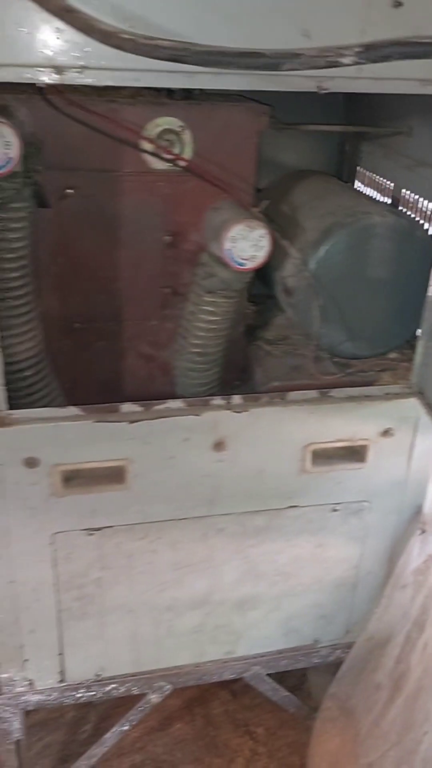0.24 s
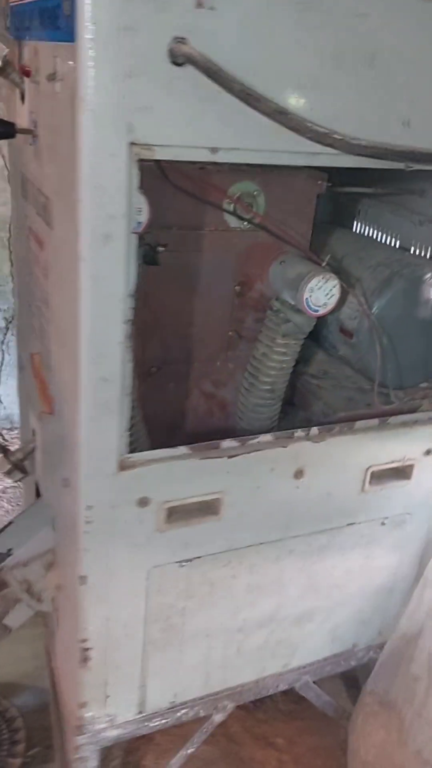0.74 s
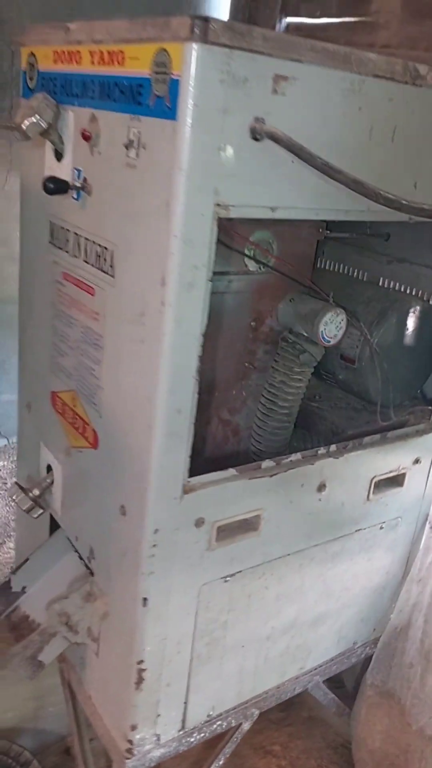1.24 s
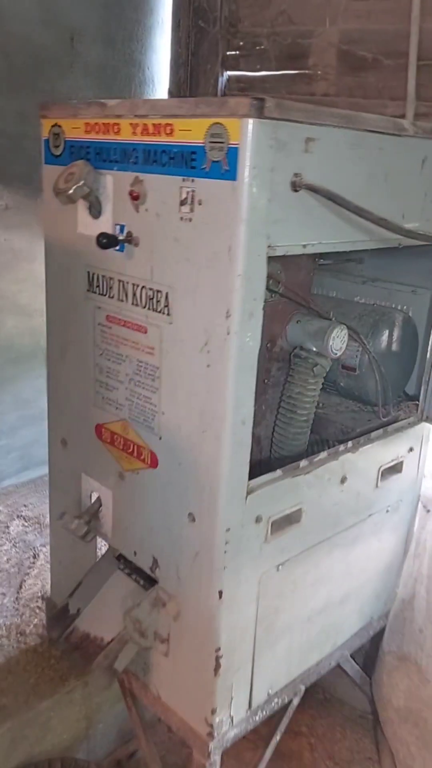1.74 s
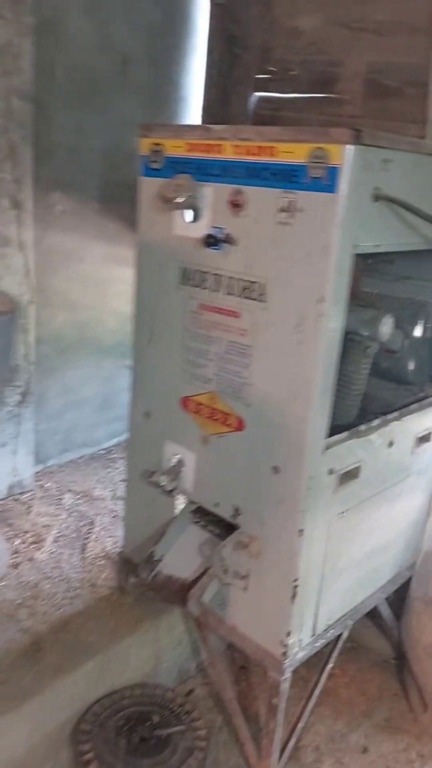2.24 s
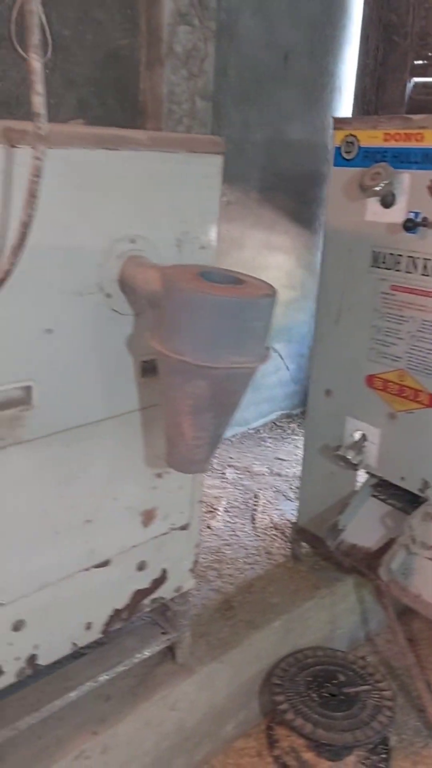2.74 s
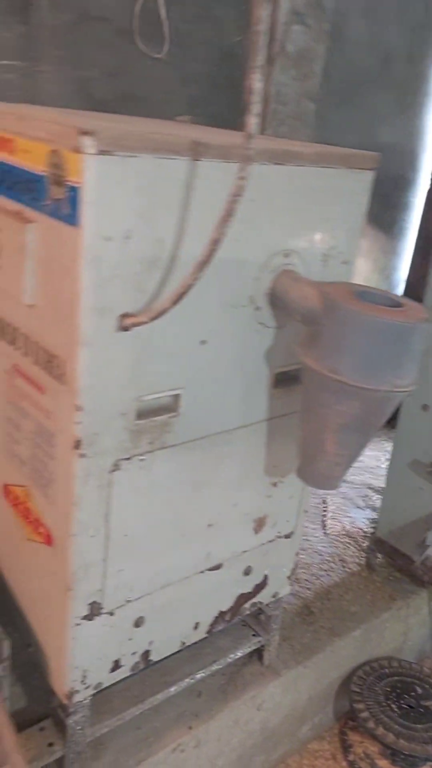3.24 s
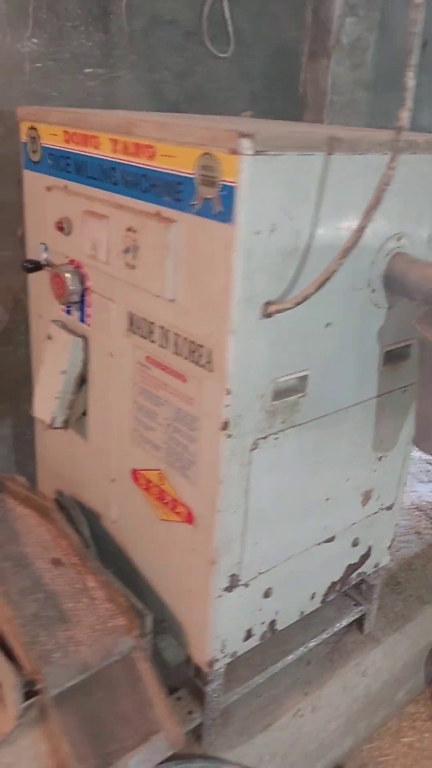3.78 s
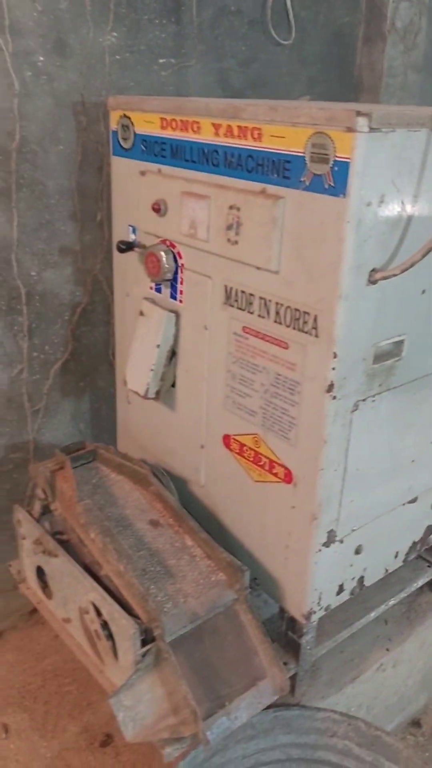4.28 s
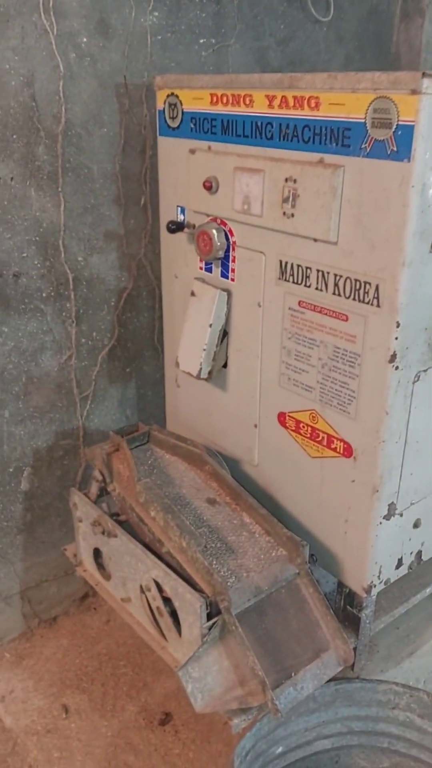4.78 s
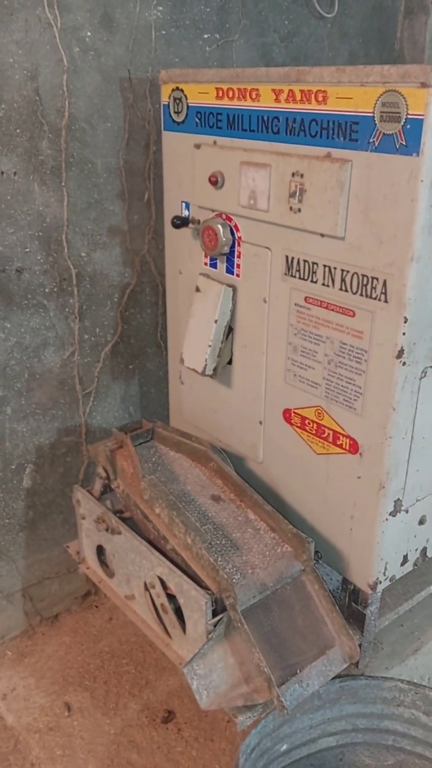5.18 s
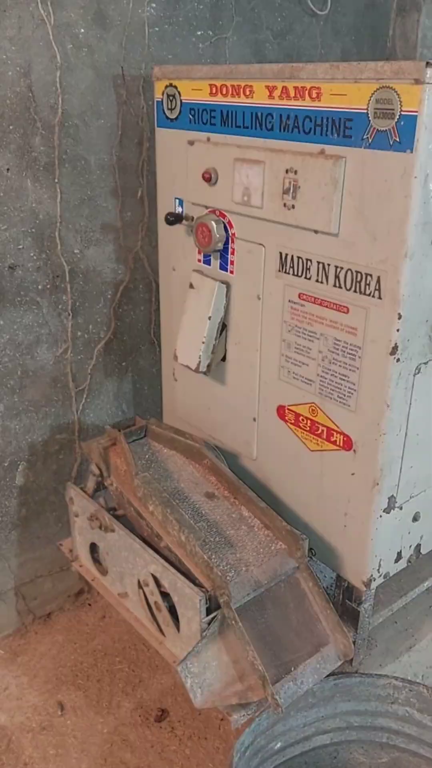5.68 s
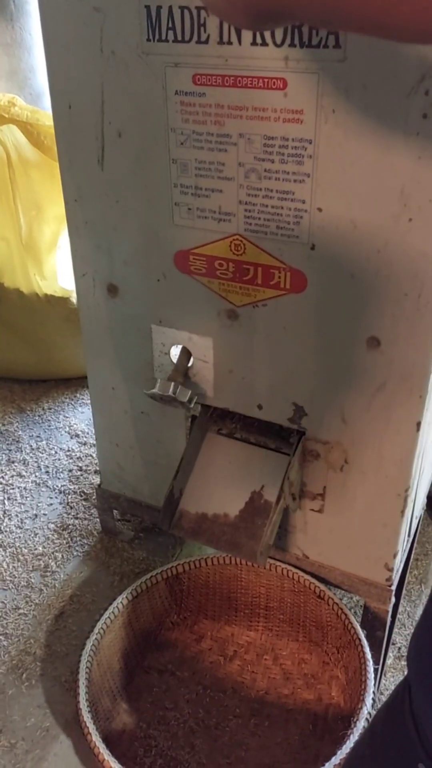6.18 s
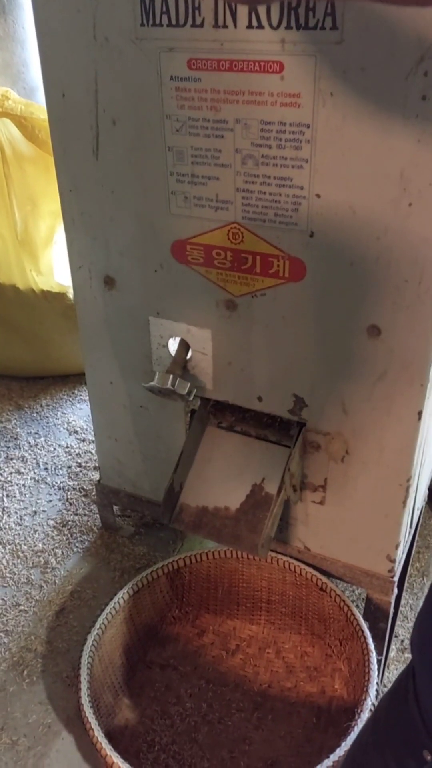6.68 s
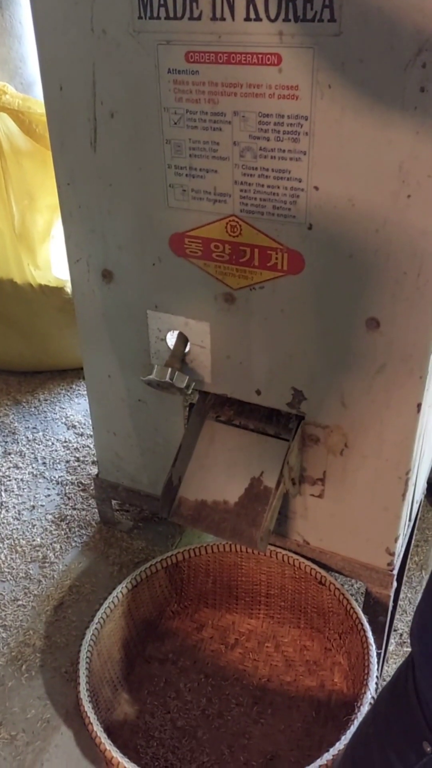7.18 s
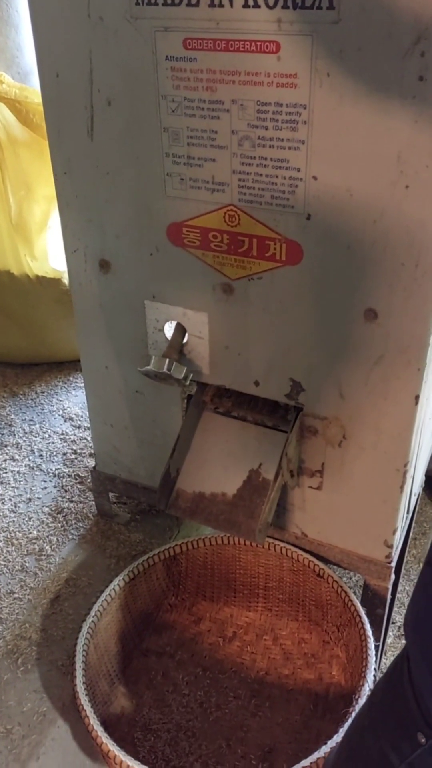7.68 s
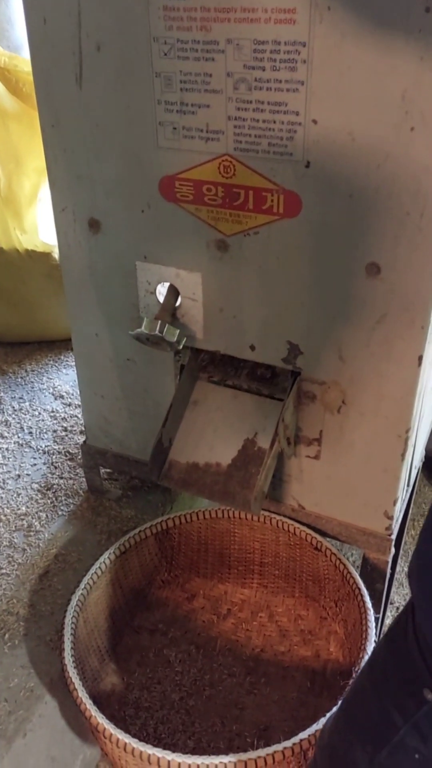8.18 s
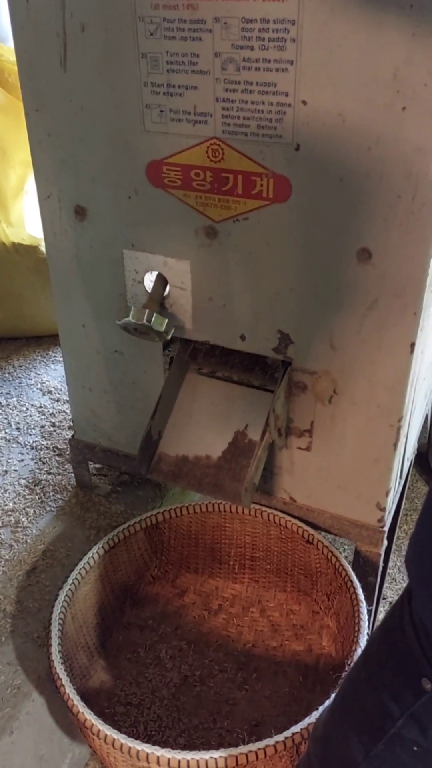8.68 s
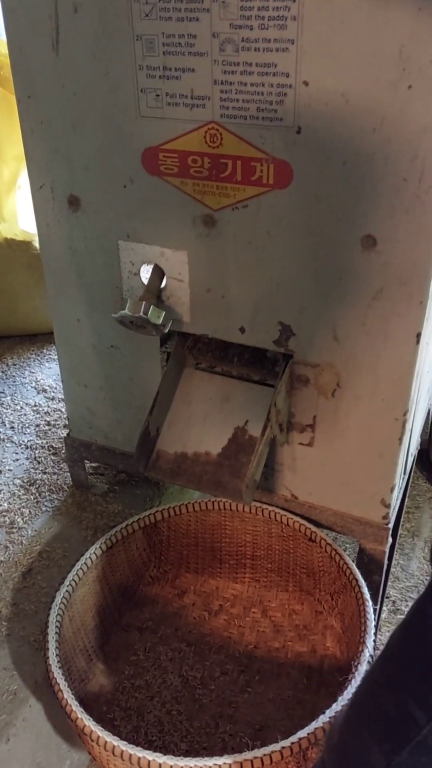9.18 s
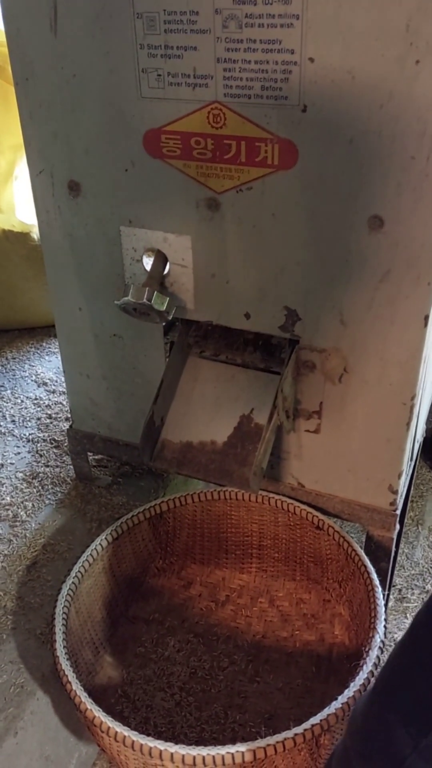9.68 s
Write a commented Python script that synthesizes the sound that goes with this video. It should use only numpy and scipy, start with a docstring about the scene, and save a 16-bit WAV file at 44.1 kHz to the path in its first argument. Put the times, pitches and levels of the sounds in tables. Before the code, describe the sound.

In a quiet farm shed with a slight echo, chicks chirp and a hen clucks softly, with fingers rubbing and once sharply tapping the right side of the microphone. The sound then switches abruptly to a nearby rice milling machine already at full speed. Its motor and rotor drone loudly and steadily, with ringing metal panels, a low roar of air and a hiss of grain.

```python
"""Chicks peep and a hen clucks in a hard-walled farm shed, while a hand rustles and taps on the camera,
close to the right microphone. The chicks whistle in falling and rising glides; the hen pushes rough
pulses through her throat. After an instant of silence we stand by a belt-driven rice mill at full
speed: its rotor sings a stack of orders, motor and shafts hum, sheet panels ring, and air and grain
rush through the housing."""
import sys
import numpy as np
from scipy import signal
from scipy.fft import rfft, irfft, next_fast_len
from scipy.io import wavfile
from scipy.ndimage import map_coordinates

SR = 44100
rng = np.random.default_rng(int(sys.argv[2]) if len(sys.argv) > 2 else 0)


def int16_out(signal):
    """Quantize to a 16-bit WAV file."""
    q = np.round(np.clip(np.atleast_2d(signal).T, -1, 1) * 32767)
    wavfile.write(sys.argv[1], SR, q.astype(np.int16))


N = 437913

SHED_END_S, MILL_START_S = 5.771, 5.802
BLADE_PASS_HZ = 220.15
# how alike the mill's rush arrives at the two microphones: f/Hz, likeness/1
MILL_LIKENESS = [(100, 0.88), (200, 1), (350, 0.59), (700, 0.4), (1300, 0), (3000, 0), (12000, 0.032)]


def chicks(far_db=-58, far_calls=34, sag_octaves_per_s=1.1, query_start_hz=2100, beak_hz=1880):
    """Near chicks cry, chirp and peep; the rest of the brood chatters farther off, with more room sound."""
    # the nearest chick holds a note, then breaks downward: t/s, length/s, level/dB, pan/dB
    cries = [(0.073, .26, -44.5, -3), (0.766, 0.19, -43.5, -4), (1.565, 0.096, -51.5, -5),
             (2.038, 0.23, -44, -3), (2.657, .24, -43.5, -2), (3.419, 0.23, -41.5, -2),
             (4.487, .28, -44, 2.5), (5.04, .27, -44.5, -1), (5.68, 0.099, -51.5, 1)]
    # pitch of every cry at start, knee and end: f/Hz
    cry_hz = [3356, 3056, 2140]
    # quick diving chirps: t/s, length/s, level/dB
    chirps = [(0.463, .09, -56), (1.72, .09, -66), (2.371, 0.096, -54.5), (2.833, 0.074, -50.5),
              (2.986, 0.085, -62), (3.584, 0.091, -49), (4.618, 0.12, -50), (4.859, 0.1, -50.5),
              (5.318, 0.11, -52), (5.607, 0.089, -62)]
    # pitch of every chirp at start, knee and end: f/Hz
    chirp_hz = [5240, 4000, 3170]
    # plain peeps that sag evenly: t/s, length/s, first f/Hz, level/dB
    peeps = [(0.125, 0.24, 3970, -54.5), (.93, 0.14, 4520, -63), (1.25, 0.13, 3640, -56),
             (1.755, 0.22, 4870, -57), (1.97, 0.094, 3940, -51.5), (2.509, 0.15, 4750, -54.5),
             (3.229, 0.27, 2914, -42), (3.251, 0.26, 4750, -52.5), (3.763, 0.14, 4140, -57.5),
             (3.979, .22, 2856, -45.5), (4.035, 0.085, 4840, -47), (4.09, 0.1, 4480, -52),
             (4.676, 0.077, 2600, -48), (4.985, .12, 4650, -61), (5.257, .08, 5260, -56),
             (5.655, 0.085, 3990, -52)]
    # rising, questioning peeps: t/s, length/s, last f/Hz, level/dB
    queries = [(1.125, .09, 3630, -58.5), (3.16, .08, 2850, -61), (3.874, 0.11, 2690, -50.5)]
    out = np.zeros((2, N))
    for s, length, db, pan_db in cries:
        call = peep(length, cry_hz, knee=.64, loudest=0.48, break_curve=.8, waver=.007,
                    overtone_db=-22.5, rasp_db=-19, break_db=22, rasp_hz=1295, swell_db=6.5)
        add(out, s, amp(db) * sides(pan_db) * in_shed(call, wet_db=3))
    for s, length, db in chirps:
        call = peep(length, chirp_hz, knee=.5, overtone_db=-23, rasp_db=-13.5, swell_db=5)
        add(out, s, amp(db) * sides(-5) * in_shed(call, wet_db=3))
    for s, length, first_hz, db in peeps:
        pitches = first_hz * 2 ** (-sag_octaves_per_s * length * np.array([0, .5, 1]))
        call = peep(length, pitches, overtone_db=-27, rasp_db=-12.5, break_db=12, swell_db=9.5)
        add(out, s, amp(db) * sides(-3.5) * in_shed(call, wet_db=0))
    for s, length, last_hz, db in queries:
        call = peep(length, np.geomspace(query_start_hz, last_hz, 3), swell_db=2)
        add(out, s, amp(db) * sides(-7) * in_shed(call, wet_db=0))
    for k, (when, high, faint) in enumerate(rng.random((far_calls, 3))):
        s = (k + when) * SHED_END_S / far_calls
        pitches = (2700 + 1700 * high) * np.array([1.1, .95, .75])
        call = peep(.11, pitches, overtone_db=-21, rasp_db=-14, swell_db=2)
        add(out, s, amp(far_db - 4.7 * faint) * sides(-1.4) * in_shed(call, wet_db=11))
    # a chick is too small to radiate much below beak_hz
    return filtered(out, lambda hz: 1 / np.sqrt(1 + (beak_hz / (hz + 1)) ** 10))


def peep(length, pitches, knee=0.52, loudest=0.49, break_curve=1.097, waver=0.0111, overtone_db=-21,
         rasp_db=-16, break_db=10, rasp_hz=1000, swell_db=8, swell_width=0.24, edge_s=0.0097):
    """A chick's whistle swells, glides to its knee, then breaks hoarsely away to its last pitch."""
    t = np.arange(int(length * SR)) / SR
    u, size = t / length, len(t)
    first_hz, knee_hz, last_hz = pitches
    to_knee = np.minimum(u / knee, 1)
    past_knee = np.maximum(u - knee, 0) / (1 - knee)
    pitch = first_hz + (knee_hz - first_hz) * to_knee + (last_hz - knee_hz) * past_knee ** break_curve
    phase = 2 * np.pi * np.cumsum(pitch * (1 + waver * wobble(108.4, size))) / SR
    gate = np.minimum(np.minimum(t, length - t) / edge_s, 1)
    arch_db = swell_db * np.exp(-((u - loudest) / swell_width) ** 2)
    swell = unit(gate * amp(arch_db + 4.5 * wobble(70.5, size)))
    fringe = wobble(rasp_hz, size) * np.sin(phase) + wobble(rasp_hz, size) * np.cos(phase)
    rasp = amp(rasp_db + break_db * np.abs(2 * u - 1)) * fringe  # cleanest in mid-call
    overtone = amp(overtone_db + 3 * wobble(300, size)) * np.sin(2 * phase)
    return unit(np.sin(phase) + overtone + rasp) * swell


def hen(typical_hz=237.2, typical_s=0.0638, fall=0.259, jitter=0.054, lead_s=0.00027):
    """Clucks are short falling runs of rough pulses through the throat; whines are hoarse single notes."""
    # clucks, a little to the right: t/s, length/s, level/dB
    clucks = [(0.234, 0.061, -41), (0.643, 0.08, -42), (1.004, 0.058, -46), (1.055, 0.029, -42),
              (1.123, 0.03, -44), (1.395, 0.069, -42.5), (1.753, 0.072, -42.5), (2.04, 0.086, -38.5),
              (2.354, 0.073, -42.5), (2.69, .065, -37), (3.025, 0.064, -39.5), (3.408, 0.061, -37.5),
              (3.908, 0.056, -38), (4.421, 0.067, -44.5)]
    # resonances of her throat: f/Hz, gain/dB
    throat = [(120, -22), (220, -12), (330, -12), (480, -9), (680, -4), (950, -7.5), (1130, -12.5),
              (1350, -27), (2500, -25.5), (5000, -93)]
    # whining notes: t/s, length/s, f/Hz, level/dB
    whines = [(1.037, 0.05, 1216, -51), (3.803, 0.12, 948, -54), (5.649, 0.068, 1010, -53.5)]
    out = np.zeros((2, N))
    for s, length, db in clucks:
        pitch_hz = typical_hz * (typical_s / length) ** .13  # shorter clucks are higher
        u = np.linspace(0, 1, int(length * SR))
        cycles = np.cumsum(pitch_hz * (1 + fall * (.5 - u) + jitter * wobble(206, len(u)))) / SR
        pulses = unit(np.diff(np.floor(cycles), prepend=0))
        voice = unit(filtered(pulses + rng.standard_normal(len(u)), colour(throat)))
        chest = 0.3 * u * np.cos(2 * np.pi * cycles)  # the fundamental grows as the note falls
        cluck = (voice + chest) * np.interp(u, [0, .35, .75, 1], [0, 1, 1, 0])
        add(out, s, amp(db) * sides(-4.5) * in_shed(cluck, wet_db=-1.5))
    for s, length, pitch_hz, db in whines:
        size = int(length * SR)
        cycles = np.cumsum(pitch_hz * (1 + 0.23 * wobble(700, size))) / SR
        whine = unit(np.sin(2 * np.pi * cycles) * np.hanning(size))
        add(out, s, amp(db) * in_shed(whine, wet_db=4))
    # the right microphone is nearer and hears her first
    return filtered(out, lambda hz: np.exp(1j * np.pi * hz * lead_s * np.array([[-1], [1]])))


def mill(move_s=(7.7, 8.6), slip=0.000696):
    """The running mill, as the camera shifts from spot A to spot B in its standing waves."""
    start = round(MILL_START_S * SR)
    t = np.arange(start, N) / SR
    spot = np.interp(t, move_s, [0, 1])
    clock = np.cumsum(1 + slip * wobble(3.03, len(t))) / SR  # belt slip sways all speeds together
    out = air_and_grain(clock) + rotor(clock, spot) + drive_hum(clock, spot) + panels(spot)
    return np.pad(out, ((0, 0), (start, 0)))


def air_and_grain(clock, roar_db=-19.5, hiss_db=-28.5, belt_lap_hz=9.87, blades=5, chop=0.055):
    """Air and grain rush through the mill; part repeats with each belt lap and each turn of the rotor."""
    # low roar of air and grain: f/Hz, density/dB
    roar_colour = [(25, -33), (50, -24.5), (90, -6), (170, -7.5), (250, 1), (400, -3), (530, -4.5),
                   (740, -2.5), (950, -10), (1350, -9.5), (1480, -13.5), (2100, -15), (2500, -18),
                   (5000, -52)]
    # hiss of the husks: f/Hz, density/dB
    husk_colour = [(900, -39), (1800, -32), (2500, -8), (3300, -2.5), (4450, -2.5), (4850, -4.5),
                   (5200, -2), (5800, -5), (6400, -6.5), (7400, -6), (8300, -11), (10300, -11),
                   (12000, -6.5), (14000, -13), (16000, -12)]
    size = len(clock)
    belt = amp(-6) * rattle(colour(roar_colour), belt_lap_hz, clock)
    dull_husks = lambda hz: colour(husk_colour)(hz) / (1 + (hz / 7500) ** 4)
    shaft = amp(-8) * rattle(dull_husks, BLADE_PASS_HZ / blades, clock)
    roar_gain = amp(roar_db + 0.45 * wobble(21.99, size)) * sides(-2.5)
    roar = roar_gain * unit(rush(colour(roar_colour), MILL_LIKENESS)[:, -size:] + belt)
    hiss_gain = amp(hiss_db + 0.54 * wobble(150, size)) * sides(-4.5)
    hiss = hiss_gain * unit(rush(housing(husk_colour), MILL_LIKENESS)[:, -size:] + shaft)
    # every pass of a blade chops the hiss a little
    return roar + hiss * (1 + chop * np.sin(2 * np.pi * BLADE_PASS_HZ * clock))


def rattle(gain, turn_hz, clock):
    """Noise that repeats with every turn of a shaft or belt; its bass is alike at both microphones."""
    pattern = rng.standard_normal((2, round(SR / turn_hz)))
    laps = pattern[:, np.round(clock * SR).astype(int) % pattern.shape[1]]
    share = lambda hz: np.sqrt(np.abs(1 + np.array([[1], [-1]]) * along(MILL_LIKENESS, hz)))
    mid, side = filtered(laps, lambda hz: gain(hz) * share(hz))
    return unit(np.array([mid + side, mid - side]))


def housing(points, ripple_db=2.0, spacing_hz=55):
    """A colour rippled by the many small modes of the sheet-metal housing."""
    knots = rng.standard_normal(1024)
    ripple = lambda hz: map_coordinates(knots, [hz / spacing_hz], mode="mirror")
    return lambda hz: colour(points)(hz) * amp(ripple_db * ripple(hz))


def rotor(clock, spot, trim_db=-1):
    """The rotor sings at whole multiples of the rate at which its blades pass."""
    # rotor orders: multiple, relative level at A/dB, at B/dB, pan/dB
    orders = [(2, -41, -59, -19), (3, -31.5, -27, 2), (4, -30.5, -33.5, -31), (5, -42.5, -47, -15),
              (6, -35.5, -31, 2.5), (7, -39, -40, -1), (8, -43.5, -42, -14), (9, -42, -72, -2),
              (10, -43, -42, -2), (11, -62, -49, 3), (13, -48, -48, 28), (15, -52.5, -50, 45)]
    return sum(tone(order * BLADE_PASS_HZ * clock, trim_db + a_db + spot * (b_db - a_db), pan_db)
               for order, a_db, b_db, pan_db in orders)


def drive_hum(clock, spot, trim_db=-1.5):
    """Motor, belts and shafts hum, each at its own pitches."""
    # tones of the drive: f/Hz, relative level at A/dB, at B/dB, pan/dB
    lines = [(67.3, -58, -52, -3), (87.5, -41, -39, -3), (100.9, -40, -38, -4), (173.6, -46, -44, -10),
             (261.1, -41, -35, -12), (388.9, -37, -42, 0), (476.4, -35, -34, 12), (562.6, -40, -34, -7),
             (576, -36, -35, 1), (635.2, -38, -39, -2), (670.4, -34, -29, 1), (744.2, -38, -39, -3),
             (1341.8, -41, -42, -2), (1390.2, -43, -44, 2), (1405, -46, -46, -1), (1897.6, -50, -48, -5),
             (2012, -49, -49, -3), (2481.7, -52, -54, 1), (2847.8, -59, -47, -4), (2932.6, -52, -53, 0),
             (3083.3, -51, -53, 3), (3215.2, -53, -52, -3), (5209.7, -56, -50, -6), (5376.6, -49, -64, -15),
             (5706.3, -54, -55, -4)]
    return sum(tone(hz * clock, trim_db + a_db + spot * (b_db - a_db), pan_db)
               for hz, a_db, b_db, pan_db in lines)


def tone(cycles, db, pan_db, flutter_db=1.16, blur_rad=0.23, spread_rad=0.47):
    """One machine line; vibration makes it flutter, and reflections shift it between the microphones."""
    blur = blur_rad * wobble(14, len(cycles))
    lag = spread_rad * rng.uniform(-0.76, 1) * np.array([[.5], [-.5]])
    phase = 2 * np.pi * (cycles + rng.random()) + blur + lag
    return np.sqrt(2) * amp(db + flutter_db * wobble(9, len(cycles))) * sides(pan_db) * np.sin(phase)


def panels(spot):
    """Sheet panels and screens ring in narrow bands of noise."""
    # panel resonances: f/Hz, width/Hz, level at A/dB, at B/dB
    modes = [(338, 29, -39.5, -39), (655, 65, -35, -40), (1190, 24, -39, -38.5), (1551, 25, -35.5, -41),
             (2190, 70, -51, -42), (4470, 46, -39, -51), (5220, 220, -43, -52), (5460, 30, -52, -49),
             (6200, 40, -48, -64), (7370, 60, -49, -61)]
    out = np.zeros((2, len(spot)))
    for hz, width, a_db, b_db in modes:
        ring = filtered(rng.standard_normal(out.shape), lambda f: 1 / (1 + 2 * ((f - hz) / width) ** 2))
        out += amp(a_db + spot * (b_db - a_db)) * sides(-3.3) * unit(ring)
    return out


def hand_rustle(trim_db=-2, crackle=0.48, catches_per_s=90):
    """Skin rubs over the camera body, catching in tiny ticks."""
    # skin on the casing: f/Hz, density/dB
    skin = [(100, -18), (700, 0), (1300, -1.5), (1800, 6.5), (3000, 11), (5000, -0.5), (7000, -2),
            (9000, -8.5), (12500, -5), (16000, -9.5)]
    catches = (rng.random(N) < catches_per_s / SR) * rng.standard_normal((2, N))
    slide = rush(colour(skin), likeness=[(300, 0.47), (3000, 0.117)])
    rub = slide + crackle * unit(filtered(catches, colour(skin)))
    return rubbing() * amp(trim_db + 0.79 * wobble(120)) * sides(-6) * rub


def rubbing(attack_s=0.14, t60_s=0.63, resting_db=-66, uneven_db=1.3):
    """Strength of the rustle: strokes set in, press or ease off, and die away; the skin drags unevenly."""
    # strokes of the hand: t/s, length/s, relative level at start/dB, at end/dB
    strokes = [(0, 0.083, -41.5, -48), (.54, .22, -56.5, -46), (1.451, 0.17, -48.5, -49.5),
               (2.002, 0.19, -51, -42), (2.675, 0.11, -48.5, -48.5), (3.067, 0.035, -60, -61),
               (3.435, 0.28, -47, -58.5), (4.03, 0.16, -43, -46), (4.49, .2, -51.5, -59),
               (5.103, .06, -57, -68), (5.71, .06, -58, -59)]
    t = np.arange(N) / SR
    power = amp(resting_db) ** 2
    for s, length, start_db, end_db in strokes:
        attack = np.clip((t - s) / attack_s + 1, 0, 1) ** 2
        press_db = np.interp(t, [s, s + length], [start_db, end_db])
        release_db = -60 * np.maximum(t - s - length, 0) / t60_s
        power = power + (attack * amp(press_db + release_db)) ** 2
    return np.sqrt(power) * amp(uneven_db * wobble(25))


def hand_knocks(tick_t60_s=0.0031):
    """Fingers tap the camera and the palm bumps it, right beside the right microphone."""
    # finger contacts: t/s, tick level/dB, tick f/Hz, thud level/dB, thud f/Hz
    taps = [(3.9618, -17.5, 5100, -13, 556), (3.975, -7, 4530, -19, 400), (3.995, -34, 9000, -60, 500)]
    # colour of a finger's tick: f/Hz, gain/dB
    finger = [(500, -6), (4000, -1.5), (9000, 4), (13000, -1.5), (16000, -4)]
    # soft bumps of the palm: t/s, level/dB, f/Hz
    bumps = [(3.163, -40, 90), (3.24, -45, 80), (3.315, -42, 65)]
    out = np.zeros((2, N))
    t = np.arange(SR // 8) / SR
    for s, tick_db, tick_hz, thud_db, thud_hz in taps:
        scrape = rng.standard_normal(len(t))
        tick = (np.sin(2 * np.pi * tick_hz * t) + scrape) * amp(-60 * t / tick_t60_s)
        contact = amp(tick_db) * filtered(tick, colour(finger))
        contact += amp(thud_db) * thud(t, thud_hz, cycles=2.1)
        add(out, s, sides(-29) * in_shed(contact, wet_db=-26))
    for s, db, hz in bumps:
        add(out, s, amp(db) * sides(-23) * thud(t, hz, cycles=5.7))
    return out


def thud(t, hz, cycles):
    """A low push that dies within a few cycles."""
    push = hz * t / cycles
    return np.sin(2 * np.pi * hz * t) * 16 * push * amp(-60 * push)


def fingertip():
    """A fingertip brushes the camera in short sweeps of very fine hiss."""
    # quick brushes: t/s, length/s, level/dB
    brushes = [(0, 0.22, -52), (0.513, 0.039, -54), (1.662, .012, -61), (1.765, .012, -62),
               (2.18, .05, -57), (3.591, .01, -55.5), (3.733, .01, -61)]
    # their bright hiss: f/Hz, density/dB
    bright = [(2000, -22), (6000, -14), (9000, -10), (12500, 6), (16000, -9)]
    out = np.zeros((2, N))
    for s, length, db in brushes:
        size = int(length * SR)
        hiss = unit(filtered(rng.standard_normal((2, size)), colour(bright)))
        add(out, s, amp(db) * sides(-14) * hiss * np.hanning(size) ** .5)
    return out


def clack(s=.596, db=-32, t60_s=0.038):
    """Something hard and light clacks once in the shed, off to the right."""
    # colour of the knock: f/Hz, gain/dB
    body = [(300, -11), (1100, -17), (1600, 2), (2500, -3), (4500, -8), (8000, -23), (16000, -23)]
    t = np.arange(SR // 8) / SR
    knock = unit(filtered(rng.standard_normal(len(t)), colour(body))) * amp(db - 60 * t / t60_s)
    out = np.zeros((2, N))
    add(out, s, sides(-7) * in_shed(knock, wet_db=-5.5))
    return out


def in_shed(call, wet_db, build_s=0.003):
    """A sound with the walls' answer, which builds up briefly and is new for each place it comes from."""
    # decay time of the shed: f/Hz, t60/s
    decay = [(200, 0.33), (800, 0.34), (3000, 0.39), (10000, 0.15)]
    hz, t, noise = signal.stft(rng.standard_normal((2, SR // 2)), SR, nperseg=256)
    envelope = amp(-60 * t / along(decay, hz)[:, None]) * (1 - np.exp(-t / build_s))
    _, tail = signal.istft(noise * envelope, SR, nperseg=256)
    answer = amp(wet_db) * tail / np.linalg.norm(tail[0])
    answer[:, 0] += 1  # the direct path
    return signal.fftconvolve(call[None], answer / np.linalg.norm(answer[0]), axes=1)


def room_tone():
    """The still air of the shed, a faint low rumble at the camera."""
    # course of the rumble: t/s, level/dB
    rumble = [(0.0, -64), (0.3, -69.5), (2.81, -68.5), (3.13, -62), (5.7, -70.5)]
    # still air: f/Hz, density/dB
    air = [(25, -20), (55, 1), (110, -7), (260, -6.5), (450, -19.5), (1300, -33.5), (6000, -25),
           (16000, -39)]
    level_db = np.interp(np.arange(N) / SR, *np.transpose(rumble))
    return amp(level_db) * rush(colour(air), likeness=[(100, 0.65), (1000, 0.085)])


def rush(gain, likeness):
    """Stereo noise of rms 1 with a given colour and left-right likeness."""
    angle = lambda hz: np.arccos(np.clip(along(likeness, hz), -1, 1)) / 2
    white = rng.standard_normal((2, N))
    mid, side = filtered(white, lambda hz: gain(hz) * [np.cos(angle(hz)), np.sin(angle(hz))])
    return unit(np.array([mid + side, mid - side]))


def wobble(rate, size=N):
    """A smooth random curve, rate knots a second."""
    coarse = np.linspace(0, size, size // 32 + 2)
    knots = rng.standard_normal(int(size * rate / SR) + 4)
    return np.interp(np.arange(size), coarse, map_coordinates(knots, [coarse * rate / SR]))


def filtered(x, response):
    """x through a response given against frequency."""
    size = x.shape[-1]
    padded = next_fast_len(size + 4096)
    return irfft(rfft(x, padded) * response(np.fft.rfftfreq(padded, 1 / SR)), padded)[..., :size]


def colour(points):
    """Gain against frequency for (f/Hz, gain/dB) points."""
    return lambda hz: amp(along(points, hz))


def along(points, hz):
    """Interpolate (f/Hz, value) points on a log frequency axis."""
    freqs, values = np.transpose(points)
    return np.interp(np.log(hz + 1), np.log(freqs + 1), values)


def amp(db):
    """Decibels to gain."""
    return 10 ** (np.asarray(db) / 20)


def unit(x):
    """Scale to rms 1."""
    return x / np.sqrt(np.mean(x ** 2) + 1e-20)


def sides(pan_db):
    """Microphone gains of mean power 1; pan is left level minus right."""
    return unit(amp([[pan_db / 2], [-pan_db / 2]]))


def add(track, s, sound):
    """Mix a stereo sound in at time s."""
    start = round(s * SR)
    track[:, start:start + sound.shape[1]] += sound[:, :N - start]


def scene():
    """The birds in the still shed, a blink of silence, then the running mill."""
    shed = room_tone() + chicks() + hen() + hand_rustle() + hand_knocks() + fingertip() + clack()
    return shed * (np.arange(N) < SHED_END_S * SR) + mill()


def record(dry):
    """The camera rounds off the hardest peaks and keeps nothing above its band limit."""
    ceiling, top_hz = .85, 15800
    rounded = dry / (1 + np.abs(dry / ceiling) ** 6) ** (1 / 6)
    return filtered(rounded, lambda hz: hz < top_hz)


dry = scene()
out = record(dry)
int16_out(out)
```